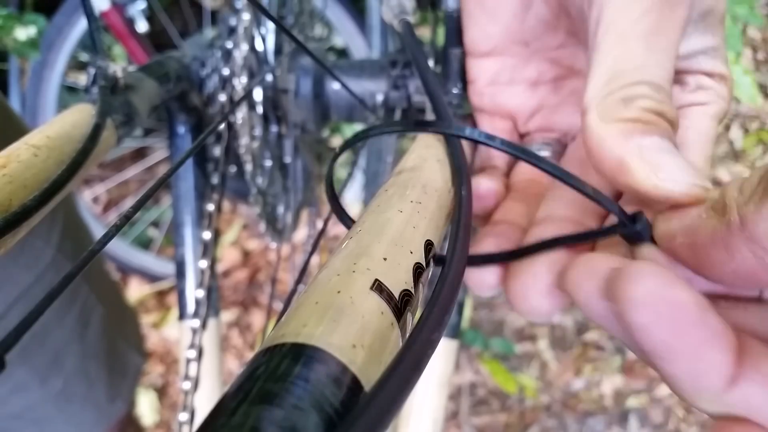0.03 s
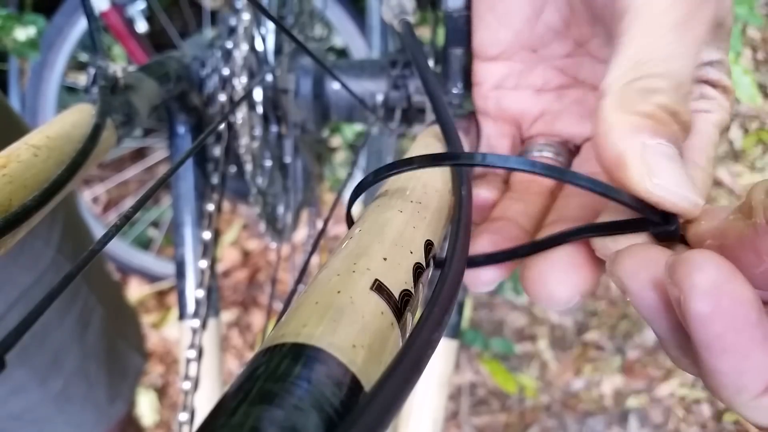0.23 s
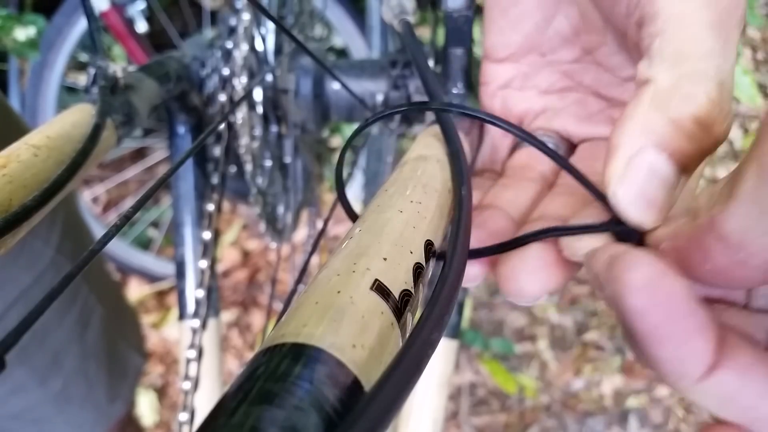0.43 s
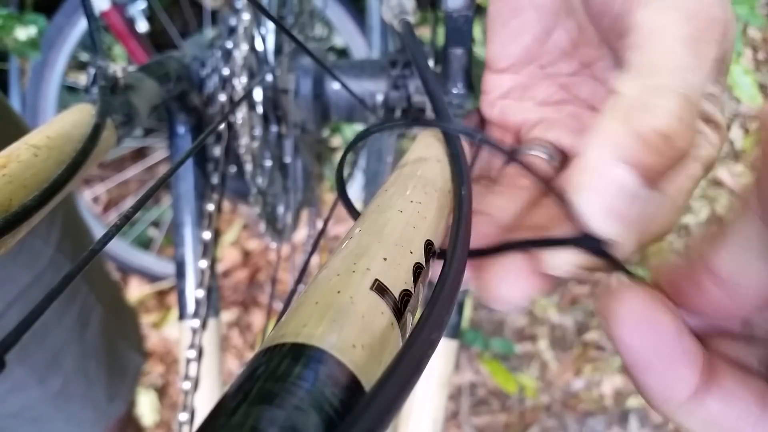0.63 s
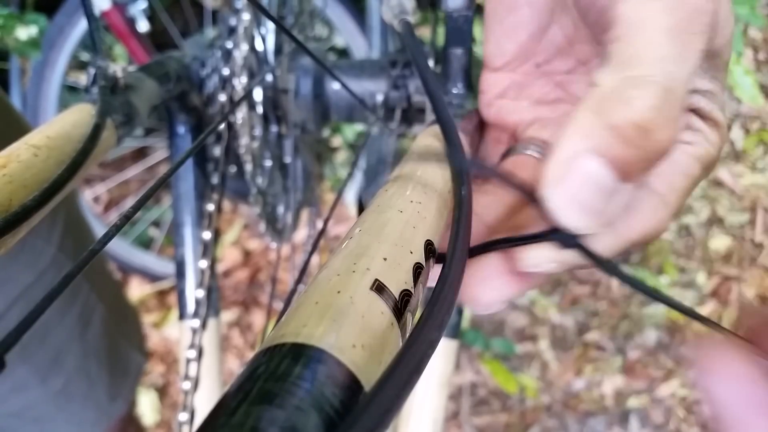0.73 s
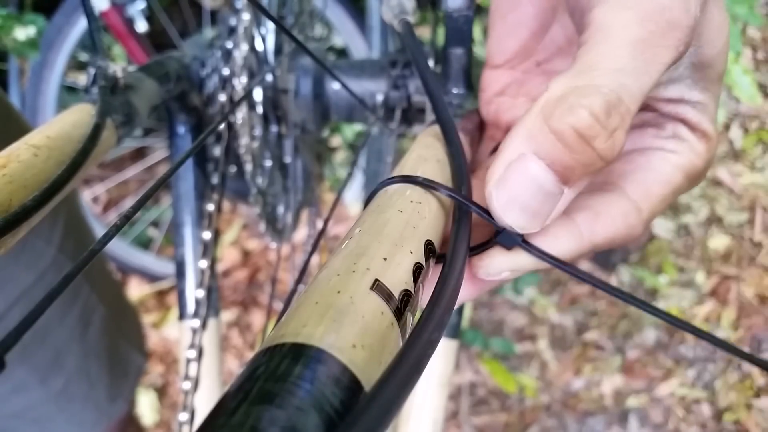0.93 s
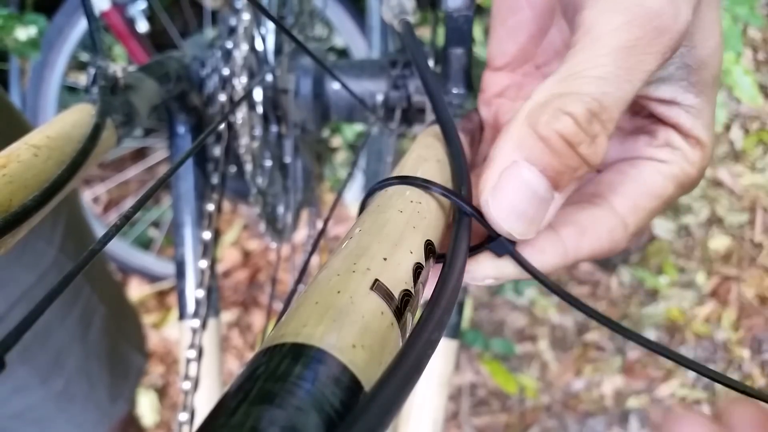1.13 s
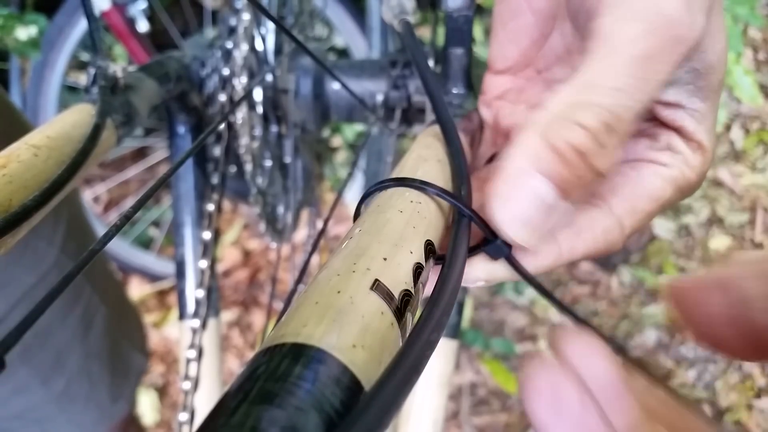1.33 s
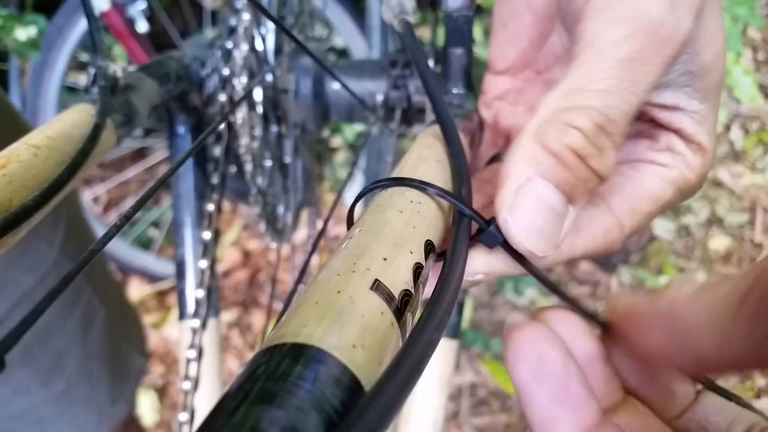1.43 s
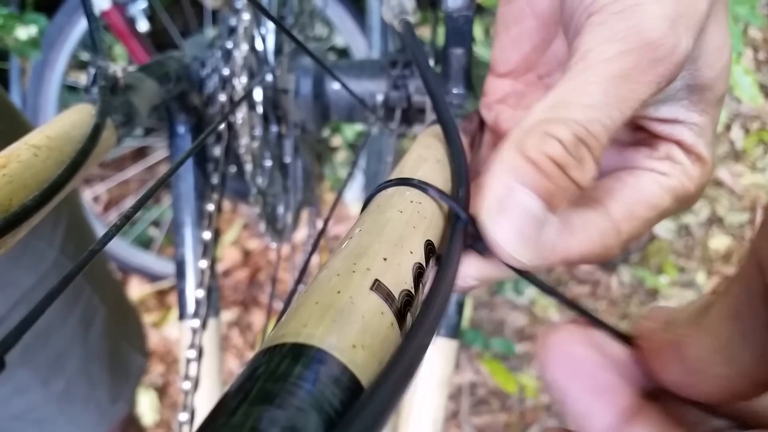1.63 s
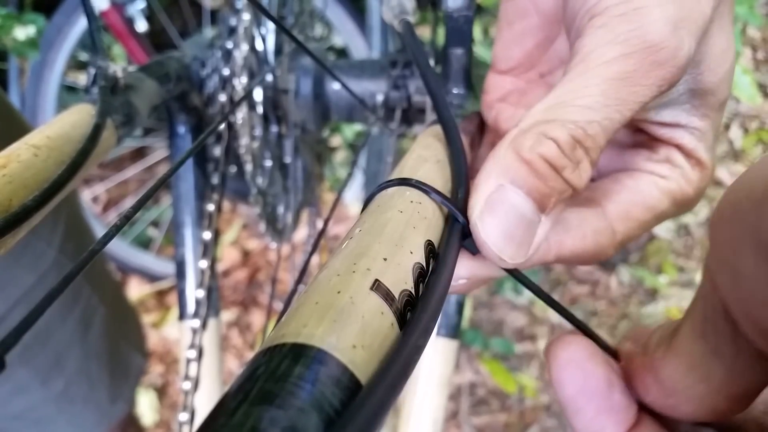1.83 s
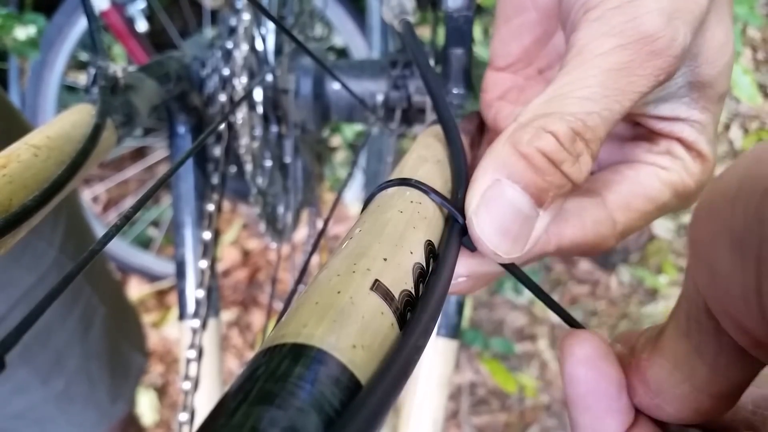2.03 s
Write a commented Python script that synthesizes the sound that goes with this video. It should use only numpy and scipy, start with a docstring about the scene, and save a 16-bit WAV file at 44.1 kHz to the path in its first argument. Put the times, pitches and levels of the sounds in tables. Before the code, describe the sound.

A plastic zip tie zips tight around a bicycle frame in two pulls, then snaps.

```python
"""A distant engine drones in softly rushing air while, close by, fingers thread a plastic zip tie with light
ticks and draw it around a bicycle frame tube. The pawl drops over the teeth in one long fast pull and one short
taut pull, each a train of impacts heard as a buzz. Two handling clicks come just before the long pull, and
single snaps follow as the tie bites. The impacts sound bright, and through contact the pulls and snaps excite
the modes of the tube. Around the second pull a thin whistle, perhaps a bird, rises once."""
import sys
import numpy as np
from scipy import signal
from scipy.fft import rfft, irfft
from scipy.io import wavfile
from scipy.ndimage import uniform_filter1d

SR = 44100
rng = np.random.default_rng(int(sys.argv[2]) if len(sys.argv) > 2 else 0)


def dump_mix(stems):
    """Bounce the given channels to the path in sys.argv[1] as a 16-bit WAV at rate SR."""
    frames = np.atleast_2d(stems).T  # one column per channel
    limited = np.clip(frames, -1, 1)  # hard clip at full scale
    pcm = np.round(limited * 32767).astype(np.int16)
    wavfile.write(sys.argv[1], SR, pcm)


N = 92610
T = np.arange(N) / SR
HZ = np.fft.rfftfreq(N, 1 / SR)

# Levels are relative; pan is the left level minus the right.
# running of the engine [t/s, firing rate/Hz, fundamental level/dB, overtone level/dB]
ENGINE_RUN = [(0, 105, -42.5, -58), (.15, 101.7, -47, -50.5), (.31, 103.8, -36, -46),
              (.43, 105.5, -31.5, -50.5), (.57, 104.8, -38, -47.5), (.75, 104.7, -30, -49.5),
              (.82, 103.2, -43, -73), (1.04, 103.6, -44.5, -55.5), (1.2, 104.1, -42.5, -65),
              (1.27, 106, -57, -68), (1.37, 104.5, -43, -53.5), (1.55, 105.8, -49.5, -67),
              (1.97, 100.9, -46.5, -60.5), (2.1, 100.3, -55, -65)]
# its overtones [multiple of the firing rate, level/dB]
ENGINE_ORDERS = [(2, -4), (3, -3), (4, -13), (5, -24.5)]
# spectral density of the outdoor air [f/Hz, level/dB]
AIR_SPECTRUM = [(20, -28), (50, -3), (85, -2), (150, -8), (280, -9), (450, -15), (650, -18), (950, -18),
                (1500, -26), (2500, -40), (4500, -52), (16000, -62)]
# its envelope [t/s, level/dB]
AIR_LEVEL = [(0, -44.5), (.35, -44), (.74, -44.5), (.85, -52), (1.1, -47.5), (1.6, -53), (1.85, -50.5),
             (2.1, -50)]
# its likeness between the ears [f/Hz, correlation]
AIR_CORRELATION = [(30, 0.88), (200, 0.66), (400, -0.13), (800, 0.18), (1500, 0.3), (4000, 0.047),
                   (16000, -0.23)]
# envelope of finger friction [t/s, level/dB]
RUB_LEVEL = [(0, -70), (.11, -60.5), (.18, -69), (.25, -56), (.31, -67.5), (.55, -72.5), (1.25, -68.5),
             (1.3, -67.5), (1.34, -79.5), (1.43, -77.5), (1.51, -67), (1.54, -82.5), (2.1, -73)]
# its spectrum [f/Hz, left/dB, right/dB]
RUB_SPECTRUM = [(1523.5, -16, -18), (3730, -7.5, -6.5), (5500, -15, -19.5), (6800, -7.5, 3), (7800, -6, -9),
                (11300, -7, -4), (13900, -3, -2), (15400, 3, -0.5)]
# narrow noise bands [t/s, duration/s, f/Hz, width/Hz, level/dB]
HISS_BANDS = [(0.054, 0.33, 7470, 420, -74.5), (0.47, 0.11, 3870, 230, -80)]
# threading impacts [t/s, level/dB, pan/dB]
TICK_IMPACTS = [(.1175, -19, 2), (.2445, -37, -2), (.2682, -30, -7), (.3692, -34, -4)]
# single clicks: two from handling before the long pull, then pawl snaps [t/s, level/dB, pan/dB, knock into the
# tube relative to the snap/dB]
SNAP_IMPACTS = [(0.6891, -23.5, 16, -0.5), (0.6924, -24.5, -10.5, -0.5), (1.8224, -13, 2, -12),
                (1.869, -34.5, 5, 7), (1.9863, -14.5, 1.5, -12.5), (2.0252, -44, 1, -30),
                (2.038, -18, 5, -4)]
# bright tone colour of the ticks, snaps and teeth at each ear [f/Hz, left/dB, right/dB]
TICK_COLOUR = [(1500, 1, -12), (4570, -24, -32), (6800, -30, 5), (8900, -12, -5.5), (12000, -9, -7.5),
               (15420, -2.5, -2.5)]
SNAP_COLOUR = [(400, -9, -7), (1400, -7, -6), (2400, -12, -13), (4000, -17, -15), (5200, -17, -10),
               (5900, -17, -12), (6600, -7, 0), (7900, -17, -18), (9000, -4, -9), (10000, -9, -14),
               (11200, -7, -8), (12600, -15, 0), (14200, -13, -7), (15500, -9, -9)]
LOOSE_COLOUR = [(400, -37.5, -25.5), (900, -29, -23), (1320, -24, -30.5), (2070, -29, -34.5),
                (3190, -33.5, -26), (4410, -33.5, -26), (5130, -16.5, -18), (6000, -25, -20.5),
                (6920, -28, -2), (7440, -14, -11), (8300, -11, -11), (10600, -8.5, -13.5),
                (11700, -26.5, 0), (12500, -7.5, -4), (13940, -3, -2.5), (14400, -6.5, -7),
                (15000, -4.5, -7.5)]
TAUT_COLOUR = [(400, -22, -20), (1470, -37, -24.5), (2030, -23, -2), (2500, -56, -30), (4250, -27.5, -24),
               (5030, -16.5, -13.5), (6230, -49, -18), (6680, -10, 6), (8040, -16.5, -25), (8500, -3, -9),
               (9750, -8, -17), (11200, -9, -10), (12700, -12, -2), (14100, -7, -2), (15580, -1, -7.5)]
# modes of the frame tube [f/Hz, level/dB, T60/s]
TUBE_MODES = [(560, -8, .03), (900, -5, .035), (1356, 0, .025), (1500, 1, .05), (2055, -7, .025),
              (2610, -12, .015), (3000, -8, .012)]
# the two pulls [t/s, tooth rate/Hz, level/dB, pan/dB]
LOOSE_PULL = [(0.7759, 252, -20.2, 3.6), (0.781, 302, -10.8, 6.0), (0.796, 361, -9.0, 4.0),
              (0.823, 247, -11.5, 3.1), (0.832, 232, -6.7, 1.2), (0.868, 400, -5.5, -0.1),
              (0.9, 484, -4.8, -2.5), (0.922, 430, -6.3, -1.2), (0.962, 430, -3.5, 1.1),
              (0.977, 137, -2.2, -1.0), (0.983, 117, -7.5, -0.3), (0.997, 145, -4.9, -3.2)]
TAUT_PULL = [(1.7449, 163, -22.6, -1.0), (1.762, 202, -17.7, 0.4), (1.777, 193, -14.7, 0.0),
             (1.784, 229, -11, -0.3), (1.794, 209, -10, 0.0), (1.804, 95, -8.5, 0.8)]
# the shrinking loop [t/s, ring band gain/dB, bite band gain/dB, top resonance f/Hz]
LOOP_RESONANCES = [(.78, 1.5, 4, 12300), (.85, -3, -1, 12800), (.89, 0, -2, 14000), (.918, 1.5, 0, 12450),
                   (.95, 5, 6.5, 13200), (1., 2, 5, 13100)]
# coupling as the closing loop presses on the tube [t/s, level/dB]
TUBE_COUPLING = [(.91, -44), (.955, -28), (1., -21)]
# a thin whistle and a fainter low one [t/s, f/Hz, level/dB]
HIGH_GLIDE = [(1.53, 6490, -105), (1.565, 6430, -88.5), (1.625, 6690, -70.5), (1.66, 6460, -76.5),
              (1.715, 6940, -71.5), (1.76, 6540, -67), (1.86, 6840, -110)]
LOW_GLIDE = [(1.51, 2780, -105), (1.54, 2720, -83), (1.585, 2620, -85), (1.65, 2780, -82),
             (1.73, 2830, -84), (1.78, 2860, -110)]
# reflections from hands, bicycle and ground, then from the surroundings: level/dB, [f/Hz, T60/s]
NEAR_DB, NEAR_T60 = -13, [(500, .07), (6800, .075), (15000, .08)]
FAR_DB, FAR_T60 = -20, [(500, .6), (4000, .48), (8000, .32), (15000, .3)]


def amp(db):
    """Amplitude ratio of a level in decibels."""
    return 10 ** (np.asarray(db) / 20)


def unit(x):
    """Normalisation to rms 1."""
    return x / np.sqrt(np.mean(x ** 2) + 1e-20)


def curve(table, t=T, column=1):
    """Linear interpolation of a column over time."""
    table = np.array(table, float)
    return np.interp(t, table[:, 0], table[:, column])


def spectrum(table, hz, column=1):
    """Interpolation of a column over log frequency."""
    table = np.array(table, float)
    return np.interp(np.log(hz + 1), np.log(table[:, 0] + 1), table[:, column])


def pan(db):
    """Interaural level difference as left and right gains."""
    return amp(np.array([db, -db]).reshape(2, -1) / 2)


def add(mix, start_s, sound):
    """Superposition of a sound on the mix."""
    part = mix[..., max(round(start_s * SR), 0):][..., :sound.shape[-1]]
    part += sound[..., :part.shape[-1]]


def convolve(x, response):
    """Convolution with each ear's impulse response."""
    return signal.fftconvolve(np.atleast_2d(x), np.atleast_2d(response), axes=1)[:, :N]


def noise(gain):
    """Spectrally shaped Gaussian noise of rms 1."""
    return unit(irfft(gain * rfft(rng.standard_normal(np.shape(gain)[:-1] + (N,))), N))


def engine(waver_db=3.0, waver_hz=9, half_order_db=-72.5):
    """Periodic firing gives a harmonic series, here with wavering levels and a weak half order."""
    phase = 2 * np.pi * np.cumsum(curve(ENGINE_RUN)) / SR
    slow = np.exp(-(HZ / waver_hz) ** 2)
    overtones = sum(amp(db + waver_db * noise(slow)) * np.sin(order * phase + 2 * np.pi * rng.random())
                    for order, db in ENGINE_ORDERS)
    overtones *= amp(curve(ENGINE_RUN, column=3))
    firing = amp(curve(ENGINE_RUN, column=2) + 1.55 * noise(slow)) * np.sin(phase)
    half_order = amp(half_order_db + waver_db * noise(slow)) * np.sin(phase / 2)
    return np.sqrt(2) * pan(db=2.5) * (firing + half_order + overtones)


def air():
    """Partially coherent noise: a soft rush whose long waves reach both ears alike."""
    left, independent = rfft(rng.standard_normal((2, N)))
    correlation = spectrum(AIR_CORRELATION, HZ)
    right = correlation * left + np.sqrt(1 - correlation ** 2) * independent
    rush = irfft(np.array([left, right]) * amp(spectrum(AIR_SPECTRUM, HZ)), N)
    return amp(curve(AIR_LEVEL)) * unit(rush)


def fingers(grain_db=2, grain_hz=150):
    """Sliding friction of skin on the strap gives a hiss with a grainy envelope."""
    hiss = noise(amp([spectrum(RUB_SPECTRUM, HZ, ear) for ear in (1, 2)]))
    grain = unit(amp(grain_db * noise(1 / (1 + (HZ / grain_hz) ** 2))))
    return amp(curve(RUB_LEVEL)) * grain * hiss


def hisses():
    """Faint narrow-band noise swells and fades under half-sine envelopes."""
    out = np.zeros(N)
    for start, duration, hz, width, db in HISS_BANDS:
        swell = np.sin(np.pi * np.clip((T - start) / duration, 0, 1))
        out += amp(db) * swell * noise(np.exp(-((HZ - hz) / width) ** 2 / 2))
    return pan(db=-3) * out


def rattle():
    """Irregular contact as a few milliseconds of white noise for each ear."""
    return rng.standard_normal((2, 256))


def impact(rattling, fade_s=.0003, hold_s=.0006, spread_s=.0011, chatter_share=.52):
    """Dispersion of bending waves brings a strike's treble first; the contact chatters and fades."""
    size = rattling.shape[1]
    t, hz = np.arange(size) / SR, np.fft.rfftfreq(size, 1 / SR)
    group_delay = spread_s * (1 - hz / hz[-1])
    strike = irfft(np.exp(-2j * np.pi * np.cumsum(group_delay) * hz[1]))
    chatter = rattling * np.exp(-np.maximum(t - hold_s, 0) / fade_s)
    chatter /= np.linalg.norm(chatter, axis=1, keepdims=True)
    return np.sqrt(1 - chatter_share) * strike + np.sqrt(chatter_share) * chatter


def click_colour(x, table, size=2048):
    """Causal filtering gives the ticks, snaps and teeth their bright tone colour at each ear."""
    hz = abs(np.fft.fftfreq(size, 1 / SR))
    log_gain = np.log(amp([spectrum(table, hz, ear) for ear in (1, 2)]))
    log_gain = uniform_filter1d(log_gain, size=21, axis=1, mode="wrap")
    response = np.fft.ifft(np.exp(np.conj(signal.hilbert(log_gain)))).real
    return convolve(x, response / np.sqrt(np.sum(response ** 2) / 2))


def ticks():
    """Impact excitation: the strap's tip taps the head as it is threaded."""
    taps = np.zeros((2, N))
    for start, db, pan_db in TICK_IMPACTS:
        add(taps, start, amp(db) * pan(pan_db) * impact(rattle()))
    return click_colour(taps, TICK_COLOUR)


def snaps():
    """Single impacts give airborne clicks and impulses that drive the tube: two handling clicks before the long
    pull, then pawl snaps as the tie bites."""
    clicks, knocks = np.zeros((2, 2, N))
    for start, db, pan_db, knock_db in SNAP_IMPACTS:
        add(clicks, start, amp(db) * pan(pan_db) * impact(rattle()))
        add(knocks, start, amp([db + knock_db]))
    return click_colour(clicks, SNAP_COLOUR), knocks


def tube(force):
    """Modal vibration: the jolted frame tube rings as a sum of damped sinusoids."""
    t = np.arange(4096) / SR
    ring = sum(amp(db - 60 * t / t60) * np.sin(2 * np.pi * (hz * t + rng.random((2, 1))))
               for hz, db, t60 in TUBE_MODES)
    return convolve(force, ring / np.linalg.norm(ring, axis=1, keepdims=True))


def pull(table, fade_s, scatter_db=1, jitter_s=.00004, alike=.4):
    """A quasi-periodic impact train: the pawl drops once per tooth, and its rattle partly repeats."""
    moving = (T >= table[0][0]) & (T <= table[-1][0])
    teeth_passed = np.ceil(np.cumsum(curve(table) * moving) / SR)
    out, common = np.zeros((2, N)), rattle()
    for t in T[1:][np.diff(teeth_passed) > 0]:
        db = curve(table, t, column=2) + scatter_db * rng.standard_normal()
        rattling = np.sqrt(alike) * common + np.sqrt(1 - alike) * rattle()
        start = t + jitter_s * rng.standard_normal()
        add(out, start, amp(db) * pan(curve(table, t, column=3)) * impact(rattling, fade_s))
    return out


def resonate(x, hz, width_hz):
    """A damped resonator of peak gain 1 whose natural frequency may glide."""
    turn = np.exp(2j * np.pi * np.cumsum(hz * np.ones(N)) / SR)
    pole = np.exp(-np.pi * width_hz / SR)
    return 2 * (turn * signal.lfilter([1 - pole], [1, -pole], x / turn + 1e-18)).real


def shrinking_loop(x, ring_hz=7000, ring_width_hz=2300, bite_hz=3340, bite_width_hz=2540):
    """Resonance follows geometry: as the loop closes, two bands dip and swell and its top peak wanders."""
    out = x + amp(-1.5) * pan(db=-9) * resonate(x, curve(LOOP_RESONANCES, column=3), width_hz=650)
    for column, hz, width in (1, ring_hz, ring_width_hz), (2, bite_hz, bite_width_hz):
        band = irfft(rfft(x) * np.exp(-((HZ - hz) / width) ** 2), N)
        out += (amp(curve(LOOP_RESONANCES, column=column)) - 1) * band
    return out


def zip_tie(loose_db=-.5, taut_db=2.5, hum_db=20, taut_coupling_db=-20):
    """Mechanical coupling: pulls and snaps set the tube ringing, and the tightening strap hums."""
    loose = amp(loose_db) * pull(LOOSE_PULL, fade_s=.0011)
    taut = amp(taut_db) * pull(TAUT_PULL, fade_s=.0007)
    clicks, knocks = snaps()
    buzz = shrinking_loop(click_colour(loose, LOOSE_COLOUR)) + click_colour(taut, TAUT_COLOUR)
    pressed = amp(curve(TUBE_COUPLING)) * loose
    hum = amp(hum_db) * resonate(pressed, hz=453, width_hz=26.5)
    return buzz + clicks + hum + tube(knocks + pressed + amp(taut_coupling_db) * taut)


def whistle(table, width_hz=74, roughness=.45):
    """Random modulation broadens a gliding tone into a slightly fuzzy whistle."""
    phase = 2 * np.pi * np.cumsum(curve(table, column=1)) / SR
    slow = np.exp(-(HZ / width_hz) ** 2)
    sidebands = noise(slow) * np.sin(phase) + noise(slow) * np.cos(phase)
    return amp(curve(table, column=2)) * unit(np.sin(phase) + roughness * sidebands)


def reflections(x, t60_table):
    """Diffuse reverberation: each band decays exponentially at its own rate."""
    hz, t, bands = signal.stft(rng.standard_normal((2, SR)), SR, nperseg=256)
    decay = amp(-60 * t / spectrum(t60_table, hz)[:, None])
    response = signal.istft(bands * decay, SR, nperseg=256)[1]
    response[:, :SR // 1000] = 0  # no echo within the first millisecond
    return convolve(x, response / np.linalg.norm(response, axis=1, keepdims=True))


def scene():
    """Superposition of the outdoor background, direct sound and reflections."""
    tie = zip_tie() + ticks()
    whistles = pan(db=-13.5) * whistle(HIGH_GLIDE) + whistle(LOW_GLIDE)
    near = amp(NEAR_DB) * reflections(tie, NEAR_T60)
    far = reflections(amp(FAR_DB) * tie + amp(.5) * whistles, FAR_T60)
    return tie + whistles + near + far + fingers() + hisses() + engine() + air()


def record(dry):
    """Band limiting: a linear-phase low-pass removes the highest treble."""
    low_pass = signal.firwin(401, cutoff=15950, window=("kaiser", 8), fs=SR)
    return signal.oaconvolve(dry, low_pass[None], "same")


dry = scene()
out = record(dry)
dump_mix(out)
```